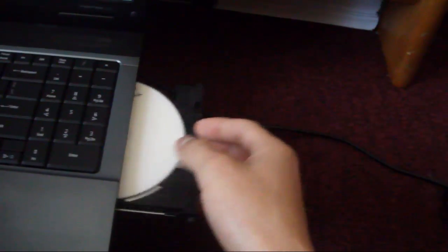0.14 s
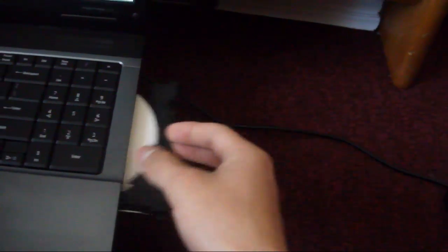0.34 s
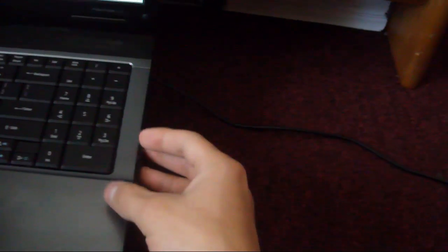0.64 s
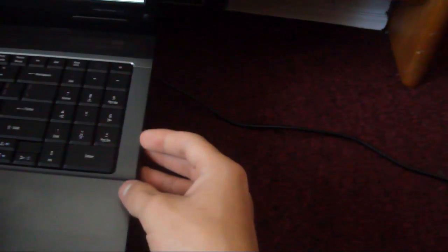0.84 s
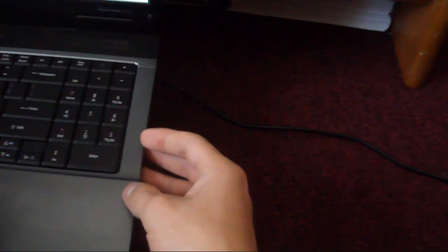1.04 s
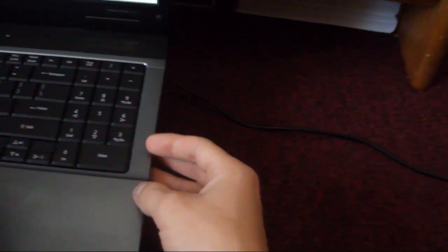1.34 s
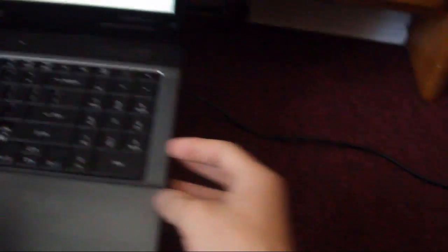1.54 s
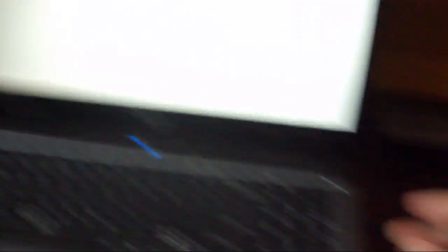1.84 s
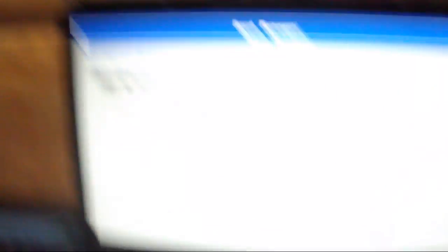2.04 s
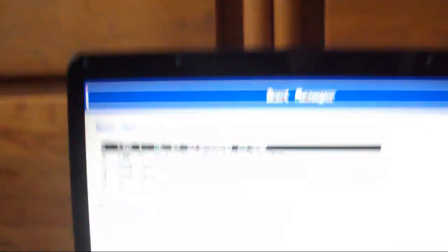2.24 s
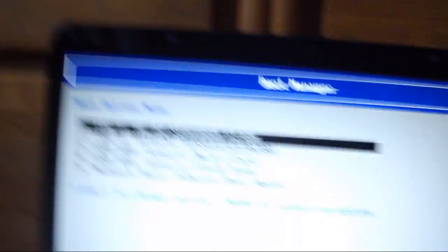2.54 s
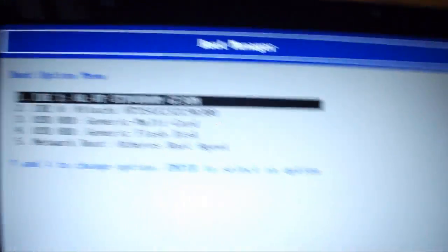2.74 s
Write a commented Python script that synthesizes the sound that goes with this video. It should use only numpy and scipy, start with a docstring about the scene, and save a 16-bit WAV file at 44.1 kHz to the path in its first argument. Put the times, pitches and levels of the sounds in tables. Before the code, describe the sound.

Small plastic clicks of a closing disc tray, followed by close bumps and rubbing of the camera case

```python
"""A hand slides a laptop's disc tray shut at arm's length in a quiet carpeted room: light plastic clicks.
Each is a tap and a rattle of slips ringing the tray's resonances, with a short room tail.
Then the hand-held camera is shifted: its case ticks, knocks and rumbles right at the two microphone ports,
from ringing modes, single pushes and shaped noise for the rubbing fingers.
Under it all lie microphone hiss, made of coloured noise, and a thin steady whine, made of one sine."""
import sys
import numpy as np
from scipy import signal
from scipy.fft import rfft, irfft
from scipy.io import wavfile
from scipy.ndimage import uniform_filter1d

SR = 44100
rng = np.random.default_rng(int(sys.argv[2]) if len(sys.argv) > 2 else 0)


def wav_record(signal):
    """Record a signal, one row per channel, as 16-bit PCM in the file named by sys.argv[1]."""
    frames = np.transpose(np.atleast_2d(signal))
    bounded = np.clip(frames, -1, 1)
    # unit amplitude maps onto the largest positive 16-bit level
    quanta = np.round(bounded * 32767).astype(np.int16)
    wavfile.write(sys.argv[1], SR, quanta)


N = 127890  # length in samples


def amp(db):
    """Turns dB into gain."""
    return 10 ** (np.asarray(db, float) / 20)


def evened(x):
    """Scales to rms 1."""
    return x / np.sqrt(np.mean(x ** 2) + 1e-20)


def read(points, hz):
    """Reads a spectrum in dB between its points, along a log frequency axis."""
    f, value = np.transpose(points)
    return np.interp(np.log(hz + 1), np.log(f + 1), value)


def coloured(x, points):
    """Gives x a spectrum and scales it to rms 1."""
    return evened(irfft(rfft(x) * amp(read(points, np.fft.rfftfreq(N, 1 / SR))), N))


def curve(rows, column=1):
    """Gain over time from one dB column of a table; -120 dB before its first row."""
    rows = np.array(rows)
    return amp(np.interp(np.arange(N) / SR, rows[:, 0], rows[:, column], left=-120))


def add(mix, start_s, sound):
    """Mixes a sound in at a time, cut off at the end of the mix."""
    part = mix[round(start_s * SR):][:len(sound)]
    part += sound[:len(part)]


def around(modes, hz, octaves):
    """Share of each mode: a bell on the octave axis, centred where the blow speaks best."""
    distance = np.log2(np.array(modes)[:, 0] / hz)
    share = np.exp(-.5 * (distance / max(octaves, .05)) ** 2)
    return share / np.linalg.norm(share)


def dying(colour, t60_s, rise_s):
    """A coloured noise tail that rises briefly while it decays exponentially; energy 1."""
    t = np.arange(SR // 2) / SR
    noise = coloured(rng.standard_normal(N), colour)[:len(t)]
    tail = noise * amp(-60 * t / t60_s) * np.minimum(t / rise_s, 1)
    return tail / np.linalg.norm(tail)


# Hiss alike in both microphone ports. Each row: frequency in Hz, relative level in dB per Hz.
HISS_ALIKE = [(5.9, -36), (10, -11.5), (18, -8.5), (33, -22.5), (60, -21.5), (113, -27), (442, -31.5),
              (499, -31.5), (810, -32.5), (6370, -32.5), (7190, -34.5), (7870, -35), (14000, -40)]
# Hiss opposite in the two ports. Each row: frequency in Hz, relative level in dB per Hz.
HISS_OPPOSITE = [(1880, -93), (3200, -69), (3360, -40.5), (3690, -61), (3780, -68), (4100, -18),
                 (7190, 0.5), (7880, -0.5), (14000, -0.5)]
HISS_ALIKE_DB, HISS_OPPOSITE_DB = -51, -55  # rms
HISS_PATCH_DB = 1.1  # rms swing of the patches


def hiss(points, level_db):
    """Steady microphone noise whose level wavers faintly in patches of time and frequency."""
    noise = coloured(rng.standard_normal(N), [(0, -100)] + points)
    z = signal.stft(noise, nperseg=1024, noverlap=768)[2]
    patches = uniform_filter1d(rng.standard_normal(z.shape), size=12, axis=0)  # across frequency
    patches = evened(uniform_filter1d(patches, size=10, axis=1))  # along time
    wavering = signal.istft(z * amp(HISS_PATCH_DB * patches), nperseg=1024, noverlap=768)[1][:N]
    return amp(level_db) * evened(wavering)


WHINE_HZ, WHINE_DB = 7440.4, -58.5  # dB: rms of the mean of the two ports
WHINE_LEAD = .5  # radians: the left port is this far ahead, the right this far behind


def whine():
    """One thin steady sine, its phase ahead in the left port and behind in the right."""
    turn = 2 * np.pi * WHINE_HZ * np.arange(N) / SR
    lead = np.array([[WHINE_LEAD], [-WHINE_LEAD]])
    return np.sqrt(2) * amp(WHINE_DB) * np.sin(turn + lead) / np.cos(WHINE_LEAD)


def resonate(x, hz, width_hz):
    """A fixed resonance, applied twice for steep sides."""
    pole = np.exp((2j * np.pi * hz - np.pi * width_hz) / SR)
    once = signal.lfilter([1 - abs(pole)], [1, -pole], x)
    return 2 * signal.lfilter([1 - abs(pole)], [1, -pole], once).real


# Plastic clicks of the tray, at arm's length. Each row: start in seconds, thud peak in dB, dull peak in dB,
# dull centre in Hz, bright peak in dB, bright centre in Hz, bright spread in octaves,
# time in seconds for the rattle to fall 60 dB.
TRAY_CLICKS = [(0.118, -60, -50, 2710, -45, 4400, .25, 0.036),
               (0.127, -43, -41.5, 1600, -32, 5900, 0.68, 0.039),
               (0.1819, -40.5, -45.5, 1650, -41, 4000, 0.23, 0.014),
               (0.1854, -56, -40.5, 1720, -45, 4100, .2, 0.027),
               (0.453, -45, -37, 2050, -30, 6300, 0.25, 0.016),
               (.456, -58, -46, 2200, -39, 4600, 0.14, .025),
               (.468, -52, -41.5, 2200, -42, 4970, 0.35, 0.053), (.479, -57, -46, 2240, -50, 5000, .5, .02),
               (0.9953, -48, -43, 1900, -36, 5240, 0.59, 0.028),
               (1.0121, -37, -40.5, 2320, -26, 4100, 0.45, 0.017),
               (1.0149, -45, -39.5, 2360, -25, 5500, 0.83, 0.027),
               (1.022, -39.5, -44.5, 1900, -39, 4300, 0.77, 0.093)]
# Resonances of the plastic tray. Each row: frequency in Hz, width in Hz, relative level in dB.
TRAY_RING = [(634, 640, 0), (1200, 750, -3), (1650, 800, 1), (2160, 440, 5.5), (2730, 1050, -6),
             (3970, 1300, 6.5), (4460, 1000, 7), (6100, 3000, 0), (6920, 840, 8), (7600, 3000, 0),
             (10100, 1000, -15.5), (12000, 2700, -9)]
# Tail of the quiet carpeted room. Each row: frequency in Hz, relative level in dB per Hz.
ROOM_COLOUR = [(300, 2), (3000, 0.5), (12000, 0.5)]
ROOM_DB, ROOM_T60_S, ROOM_RISE_S = -8, 0.23, 0.0036
TRAY_DULL_OCT, TRAY_RATTLE = 0.3, 0.47  # spread in octaves; rattle gain beside the tap
TRAY_THUD_HZ, TRAY_THUD_OCT, TRAY_THUD_LAG_S = 800, 0.48, 0.00302  # the body answers a little later
SLIP_UNEVEN = 0.55  # 0 = even hiss of slips, higher = a few separate taps


def tray():
    """Each click is a tap and a dying rattle of tiny slips in the tray's resonances, with a room tail."""
    t, out = np.arange(SR // 8) / SR, np.zeros(N)
    chance = rng.standard_normal((len(TRAY_CLICKS), len(t)))
    for row, slips in zip(TRAY_CLICKS, chance):
        start_s, thud_db, dull_db, dull_hz, bright_db, bright_hz, bright_oct, decay_s = row
        tap = t == 0
        rattle = evened(slips * abs(slips) ** SLIP_UNEVEN) * amp(-60 * t / decay_s)
        drive = tap + TRAY_RATTLE * rattle
        # neighbouring resonances start opposed
        ring = np.array([(-1) ** k * amp(db) * resonate(drive, hz, width_hz)
                         for k, (hz, width_hz, db) in enumerate(TRAY_RING)])
        parts = ((0, dull_db, dull_hz, TRAY_DULL_OCT),
                 (0, bright_db, bright_hz, bright_oct),
                 (TRAY_THUD_LAG_S, thud_db, TRAY_THUD_HZ, TRAY_THUD_OCT))
        for lag_s, peak_db, hz, octaves in parts:
            click = around(TRAY_RING, hz, octaves) @ ring
            add(out, start_s + lag_s, amp(peak_db) * click / abs(click).max())
    room = dying(ROOM_COLOUR, ROOM_T60_S, ROOM_RISE_S)
    return out + amp(ROOM_DB) * signal.fftconvolve(out, room)[:N]


# Fingers rubbing the camera case, at the microphones. Each row: time in seconds, rumble in dB, scrape in dB.
RUB = [(1.5, -72, -69), (1.75, -73, -66), (1.9, -75, -85), (1.97, -60, -89), (2.1, -78, -77),
       (2.22, -67, -96), (2.28, -58, -62), (2.34, -63, -84), (2.42, -39, -71), (2.47, -61, -51.5),
       (2.52, -54, -50.5), (2.58, -56, -51.5), (2.66, -45.5, -51.5), (2.72, -54, -62), (2.78, -47, -57),
       (2.83, -65, -69), (2.9, -62, -85)]
# Spectrum of the low rumble. Each row: frequency in Hz, relative level in dB per Hz.
RUMBLE_COLOUR = [(4, -9), (15, -7), (40, 4), (100, 1.5), (200, -18), (400, -36)]
# Spectrum of the scrape. Each row: frequency in Hz, relative level in dB per Hz.
SCRAPE_COLOUR = [(120, -45), (250, 3.5), (500, 2), (1000, -1.5), (1800, -12), (3500, -33)]
# A short rustle of skin, close by. Each row: time in seconds, level in dB.
RUSTLE = [(2.74, -77), (2.76, -46.5), (2.81, -52.5), (2.84, -60), (2.88, -83)]
# Spectrum of the rustle. Each row: frequency in Hz, relative level in dB per Hz.
RUSTLE_COLOUR = [(1500, -1.5), (3000, -7.5), (5000, -6.5), (8000, -6), (11000, -16), (14000, -27)]
SCRAPE_GRAIN_DB, RUSTLE_GRAIN_DB = 1.5, 0.5  # rms swing of the grain


def fingers():
    """Rubbing skin as shaped noise: low rumble, grainy scrape and a brief rustle."""
    rumble, scrape, rustle, grain = rng.standard_normal((4, N))
    grain = evened(uniform_filter1d(grain, size=200))
    rumble = coloured(rumble, RUMBLE_COLOUR)
    scrape = coloured(scrape * amp(SCRAPE_GRAIN_DB * grain), SCRAPE_COLOUR)
    rustle = coloured(rustle * amp(RUSTLE_GRAIN_DB * grain), RUSTLE_COLOUR)
    return curve(RUB, column=1) * rumble + curve(RUB, column=2) * scrape + curve(RUSTLE) * rustle


# Knocks on the camera case, right at the microphones. Each row: start in seconds, ring in dB,
# struck around Hz, spread in octaves, snap in dB, grip as extra damping of the ring in dB per second.
KNOCKS = [(1.6958, -29.5, 1570, 0.091, -35, 450), (1.6953, -28, 2000, 1.2, -61, 396),
          (1.9413, -26, 1680, 0.65, -28, 900), (1.9423, -33.5, 665, 0.51, -50, 18),
          (1.9457, -34.5, 1900, 0.65, -40, 20), (2.262, -42, 490, 0.51, -70, 300),
          (2.282, -43, 394, 0.38, -70, 297), (2.329, -45.5, 910, 0.26, -70, 295.5),
          (2.345, -44, 1600, 0.73, -70, 100), (2.366, -65, 950, 0.33, -70, 300),
          (2.3854, -9.5, 1450, 1.25, -30, 2494), (2.3864, -10, 594, 0.72, -15, 2500),
          (2.3874, -29, 1500, 0.58, -7, 2500), (2.3878, -16, 1500, .8, -9, 2500),
          (2.3897, -23, 894, 0.29, -4.5, 2500), (2.391, -4.5, 715, 1.2, -4, 2500),
          (2.3921, -12.5, 1600, 0.51, -9.5, 2500), (2.3956, -51, 514, 1.2, -19.5, 500),
          (2.3972, -16, 1200, 0.31, -40, 500), (2.3971, -18.5, 1050, 0.27, -44, 900),
          (2.4077, -38, 530, 0.43, -51, 300), (2.43, -43, 600, 0.45, -60, 500),
          (2.441, -32.5, 516, 0.65, -60, 400), (2.493, -43, 800, 0.8, -70, 500),
          (2.502, -41, 1000, .25, -70, 500), (2.521, -47, 620, .25, -70, 400),
          (2.54, -44, 1120, 0.23, -70, 500), (2.5696, -31.5, 2500, 0.47, -13.5, 1500),
          (2.5702, -26, 1300, 0.88, -42, 900), (2.6245, -20.5, 785, 0.44, -53, 100),
          (2.6267, -21.5, 910, 0.93, -27, 300), (2.633, -26.5, 610, 0.23, -60, 300),
          (2.648, -43, 800, 0.6, -60, 300), (2.7462, -33.5, 435, 0.26, -47, 498),
          (2.7494, -35, 700, 1.4, -55, 499), (2.7546, -29.5, 1510, .35, -35, 507),
          (2.7551, -35, 420, 0.3, -60, 200), (2.7575, -34, 1050, 0.28, -48, 500),
          (2.787, -41, 627, 0.22, -50, 300)]
# Modes of the case. Each row: frequency in Hz, relative level in dB, time in seconds to fall 60 dB.
CASE_RING = [(216, -2, 0.052), (317, -3.5, 0.18), (431, -3, 0.063), (554, -4, 0.12), (631, -0.5, 0.037),
             (776, -1.5, 0.052), (936, -3, 0.068), (1110, -6, 0.044), (1300, -7.5, 0.039),
             (1500, -1.5, 0.045), (1600, 3.5, 0.021), (1900, -1, 0.04), (1998, -0.5, 0.038),
             (2500, -7.5, 0.047), (3456, 0, 0.023)]
# Short treble modes that all start the same way. Each row: frequency in Hz, relative level in dB,
# time in seconds to fall 60 dB.
CASE_SNAP = [(3450, -9, 0.0055), (4210, -5.5, 0.0066), (5176, -1.5, 0.0082), (5530, -4, 0.0089),
             (7190, -2, 0.0058), (7750, -5.5, 0.0086), (8370, -3.5, 0.0038), (9250, -10, 0.0022),
             (11300, -28, 0.004), (13200, -38, 0.0037)]
# Dull pushes on the case with no ring. Each row: middle in seconds, peak in dB, length in seconds,
# direction as a sign.
PUSHES = [(1.584, -44, 0.0076, -1), (2.27, -35, 0.0021, -1), (2.3861, -16, 0.00077, 1),
          (2.3869, -8.5, 0.00082, -1), (2.391, -1.5, 0.00043, -1), (2.393, -2, 0.0012, -1),
          (2.3938, -5.5, 0.0012, 1), (2.3948, -19, 0.002, 1), (2.567, -32, 0.002, -1),
          (2.5705, -21.5, 0.00095, -1), (2.5727, -32, 0.001, 1), (2.614, -26.5, 0.0034, 1),
          (2.621, -52, 0.0036, -1), (2.627, -17.5, 0.0013, 1), (2.746, -35, 0.002, -1),
          (2.7502, -36.5, 0.0076, 1), (2.756, -26, 0.0019, 1), (2.839, -40.5, 0.012, -1)]
# Loose parts inside that shake on. Each row: frequency in Hz, relative level in dB per Hz.
SHAKE_COLOUR = [(40, -1), (100, 5), (400, -4.5), (900, -4.5), (1600, -13.5), (3000, -10.5), (5000, -16),
                (8000, -18)]
SHAKE_DB, SHAKE_T60_S, SHAKE_RISE_S = -23, 0.17, 0.0027
RING_RISE_S, SNAP_RISE_S = 0.00037, 0.0001
IN_STEP_HZ = 1200  # modes above this all start the same way, lower neighbours start opposed


def case():
    """Knocks ring modes near the struck pitch and snap in the treble; pushes bend once; loose parts shake."""
    t, out = np.arange(SR // 5) / SR, np.zeros(N)

    def mode(hz, db, t60_s):
        """A decaying sine."""
        return amp(db - 60 * t / t60_s) * np.sin(2 * np.pi * hz * t)

    ring = np.array([(-1) ** (k * (row[0] < IN_STEP_HZ)) * mode(*row) for k, row in enumerate(CASE_RING)])
    ring = ring * (1 - np.exp(-t / RING_RISE_S))
    snap = sum(mode(*row) for row in CASE_SNAP) / 2
    snap = snap * (1 - np.exp(-t / SNAP_RISE_S))
    for start_s, ring_db, hz, octaves, snap_db, grip_db in KNOCKS:
        struck = around(CASE_RING, hz, octaves) @ ring
        add(out, start_s, amp(ring_db - grip_db * t) * struck + amp(snap_db) * snap)
    for middle_s, peak_db, length_s, direction in PUSHES:
        bend = np.hanning(round(length_s * SR) + 2)
        add(out, middle_s - length_s / 2, np.sign(direction) * amp(peak_db) * bend)
    shake = dying(SHAKE_COLOUR, SHAKE_T60_S, SHAKE_RISE_S)
    return out + amp(SHAKE_DB) * signal.fftconvolve(out, shake)[:N]


# How clicks and knocks differ between the two ports. Each row: frequency in Hz, side minus mid in dB.
PORTS = [(60, -55), (110, -54), (200, -45), (380, -44), (690, -50), (1280, -26), (2350, -32), (4340, -11),
         (8000, -2.5), (14800, 0)]


def scene():
    """Clicks and knocks reach the ports with a phase difference that shows in the treble; rubbing is central."""
    hits = tray() + case()
    # side signal a quarter turn ahead of the mid: the left port leads
    spectrum = 1j * rfft(hits) * amp(read(PORTS, np.fft.rfftfreq(N, 1 / SR)))
    hits_side = irfft(spectrum, N)
    mid = hits + fingers() + hiss(HISS_ALIKE, HISS_ALIKE_DB)
    side = hits_side + hiss(HISS_OPPOSITE, HISS_OPPOSITE_DB)
    return np.array([mid + side, mid - side]) + whine()


OVERLOAD = 0.76  # the converter rounds off peaks towards this height
EDGE_HZ, OFFSET = 14240, .0118  # treble cut in Hz; constant offset of the wave


def record(dry):
    """Soft overload, a steep treble cut and a small constant offset."""
    taps = signal.firwin(1023, EDGE_HZ, window=("kaiser", 9), fs=SR)
    rounded = OVERLOAD * np.tanh(dry / OVERLOAD)
    return signal.oaconvolve(rounded, taps[None], "same") + OFFSET


dry = scene()
out = record(dry)
wav_record(out)
```